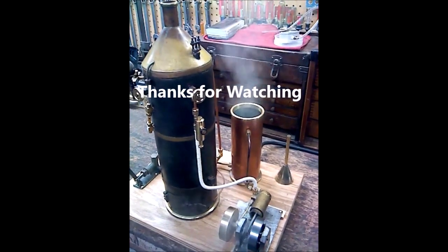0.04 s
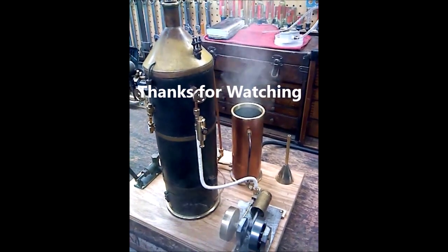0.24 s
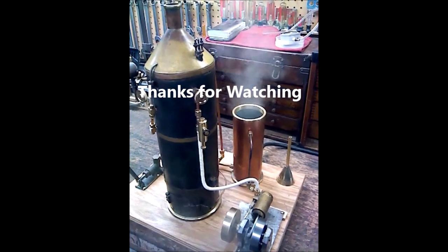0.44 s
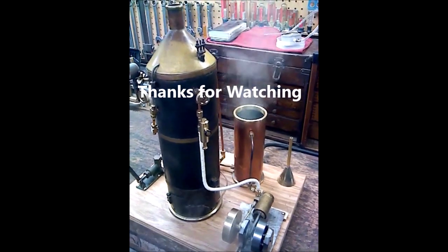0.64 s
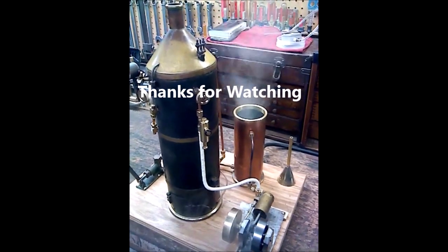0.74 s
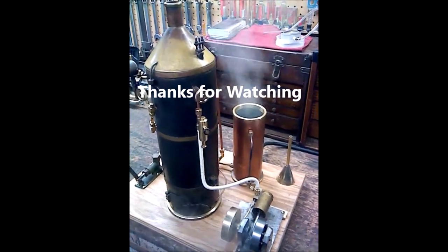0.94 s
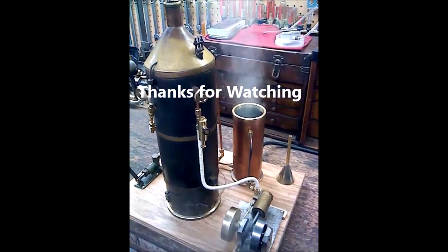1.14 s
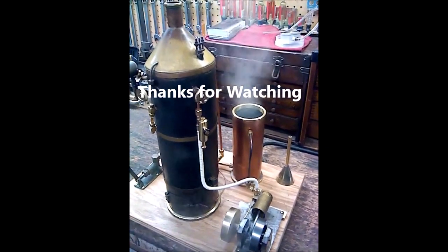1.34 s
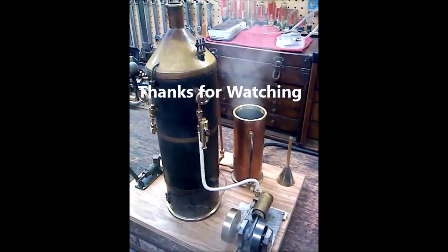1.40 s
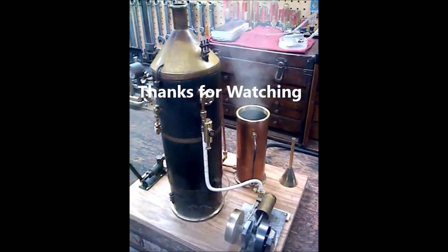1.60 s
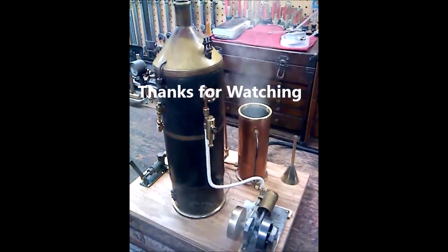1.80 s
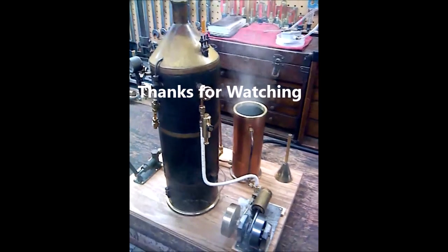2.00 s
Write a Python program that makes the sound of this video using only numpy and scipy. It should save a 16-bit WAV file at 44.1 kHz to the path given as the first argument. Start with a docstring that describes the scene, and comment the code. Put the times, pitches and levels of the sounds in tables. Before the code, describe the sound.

A small steam engine chuffs quickly and evenly over a high steam hiss.

```python
"""On a workshop bench, a single-cylinder model steam engine runs at about 500 turns a minute.
Once a turn, wet steam chuffs from the exhaust; half a turn later the crank takes up its play
with a soft double knock. Leaking steam sputters all the time, the burner murmurs under the
boiler, and the mains hums faintly. Twice the level dips briefly."""
import sys
import numpy as np
from scipy import signal
from scipy.fft import rfft, irfft
from scipy.io import wavfile

SR = 44100
rng = np.random.default_rng(int(sys.argv[2]) if len(sys.argv) > 2 else 0)


def dump_mix(stems):
    """Bounce the given channels to the path in sys.argv[1] as a 16-bit WAV at rate SR."""
    frames = np.atleast_2d(stems).T  # one column per channel
    limited = np.clip(frames, -1, 1)  # hard clip at full scale
    pcm = np.round(limited * 32767).astype(np.int16)
    wavfile.write(sys.argv[1], SR, pcm)


N = 90581


def amp(db):
    """Turns decibels into a gain."""
    return 10 ** (np.asarray(db) / 20)


def evened(x):
    """Scales a signal to an average power of 1."""
    return x / np.sqrt(np.mean(x ** 2) + 1e-20)


def read(points, hz):
    """Looks up a table's value at any pitch, gliding between its rows."""
    f, value = np.transpose(points)
    return np.interp(np.log(hz + 1), np.log(f + 1), value)


def add(mix, s, sound):
    """Mixes a sound in at s seconds."""
    part = mix[max(round(s * SR), 0):][:len(sound)]
    part += sound[:len(part)]


def colour(x, spectrum, rings, size=8192):
    """Gives a sound a broad tone colour with narrow ringing peaks on top."""
    hz = np.fft.rfftfreq(size, 1 / SR)
    peaks_db = sum(boost / (1 + (2 * (hz - f) / width) ** 2) for f, width, boost in rings)
    cepstrum = irfft(np.log(amp(read(spectrum, hz) + peaks_db)))
    cepstrum[1:size // 2] *= 2  # folded so that ringing only comes after its cause
    cepstrum[size // 2 + 1:] = 0
    ring = irfft(np.exp(rfft(cepstrum)))[:size // 2]
    return signal.oaconvolve(x, ring / np.linalg.norm(ring))[:N]


# tones of the hum: f/Hz, level/dB
HUM_TONES = [(60, -84), (120, -84)]
def hum():
    """The mains supply hums faintly in two low tones."""
    t = np.arange(N) / SR
    return sum(amp(db) * np.sqrt(2) * np.sin(2 * np.pi * (hz * t + rng.random())) for hz, db in HUM_TONES)


# how strong the flame's noise is, from low to high: f/Hz, level/dB
FLAME_SPECTRUM = [(25, -15), (70, -20.5), (100, -16.5), (170, -20.5), (270, -15.5), (380, -19), (600, -9),
                  (700, -14), (820, 1.5), (1050, 0.5), (1200, -7.5), (1450, -6), (1680, -5.5), (1850, -20),
                  (2400, -19), (4000, -16.5), (16000, -46)]
# pitches at which the flue (the chimney) rings: f/Hz, width/Hz, boost/dB
FLUE_RINGS = [(572, 62, 2), (965, 57, 6), (1373, 72, 8.5)]
def burner():
    """The flame's soft roar flutters in the flue and slowly fades."""
    start_db, fade_db_per_s, flutter_db, flutter_hz = -54.5, -2, 1.1, (9, 53)
    flutter_band = signal.butter(2, flutter_hz, "bandpass", fs=SR, output="sos")
    flutter = evened(signal.sosfilt(flutter_band, rng.standard_normal(N)))
    level = amp(start_db + fade_db_per_s * np.arange(N) / SR + flutter_db * flutter)
    return level * colour(rng.standard_normal(N), FLAME_SPECTRUM, FLUE_RINGS)


def wet_steam(drops_per_s, drop_share):
    """Swirling steam hisses; bursting droplets click and take drop_share of the power."""
    clicks = evened(rng.uniform(-0.88, 1, N) * (rng.random(N) < drops_per_s / SR))
    return np.sqrt(1 - drop_share) * rng.standard_normal(N), np.sqrt(drop_share) * clicks


# how strong the leak is, from low to high: f/Hz, level/dB
LEAK_SPECTRUM = [(2000, -47), (3600, -38.5), (4800, -20.5), (5850, -18), (6350, -6), (7150, -5),
                 (7550, -13), (8050, -13), (8550, -21.5), (9800, -28.5), (13000, -33), (15000, -28),
                 (15800, -25.5)]
# pitches at which the leak rings: f/Hz, width/Hz, boost/dB
LEAK_PEAKS = [(6245, 70, 6), (6590, 70, 7), (6790, 60, 4), (6990, 80, 8), (7200, 80, 6), (8900, 320, 7),
              (12250, 250, 4), (14520, 170, 7), (15670, 200, 10)]
def leak():
    """Wet steam leaks out with a high sizzle that slowly weakens."""
    start_db, fade_db_per_s = -45, -1.63
    level = amp(start_db + fade_db_per_s * np.arange(N) / SR)
    hiss, drops = wet_steam(drops_per_s=500, drop_share=0.16)
    return level * colour(hiss + drops, LEAK_SPECTRUM, LEAK_PEAKS)


# how long the room takes to fade by 60 dB at each pitch: f/Hz, t/s
ROOM_FADE = [(200, 0.11), (3000, 0.093), (8000, 0.096), (16000, 0.048)]
def workshop(sound):
    """The room answers with a short wash of echoes whose treble dies first."""
    echoes = rng.standard_normal(SR // 2) * (np.arange(SR // 2) / SR > .003)
    hz, t, bands = signal.stft(echoes, SR, nperseg=256)
    fade = np.exp(-np.log(1000) * t / read(ROOM_FADE, hz)[:, None])
    tail = signal.istft(bands * fade, SR)[1]
    return signal.fftconvolve(sound, tail / np.linalg.norm(tail))[:N]


# echoes from boiler and bench: delay/s, gain
NEAR_ECHOES = [(.0014, 0.0011), (.00205, 0.13), (.0042, 0.19), (.0062, .14)]
def bench(sound):
    """The sound arrives directly, then again off nearby surfaces."""
    out = sound.copy()
    for delay, gain in NEAR_ECHOES:
        add(out, delay, gain * sound)
    return out


# a blow and its rebounds: delay/s, level/dB
KNOCK_BOUNCES = [(0, 1.5), (.0043, -1), (.0105, -14.5)]
# ringing tones of the engine's base and board: f/Hz, level/dB, t/s to fade by 60 dB
BASE_TONES = [(257, -21, 0.055), (580, -12.5, 0.03), (753, -6.5, 0.09), (1370, -3, 0.022),
              (1926, 0.5, 0.017), (2210, 0, 0.019), (2450, -0.5, .016), (2730, -4, 0.013),
              (2980, -7, 0.018), (3276, -6, 0.017)]
def crank(turns):
    """On each return stroke the slightly loose crank knocks, bounces and makes the base ring."""
    half_turn_s, jitter_s, knock_db = .0622, .00015, -54
    t, blows = np.arange(SR // 8) / SR, np.zeros(N)
    for start, _, db in turns:
        for delay, bounce_db in KNOCK_BOUNCES:
            when = start + half_turn_s + delay + jitter_s * rng.standard_normal()
            add(blows, when, amp([db + bounce_db]))
    ring = sum((-1) ** k * amp(db) * np.exp(-np.log(1000) * t / fade_s) * np.sin(2 * np.pi * hz * t)
               for k, (hz, db, fade_s) in enumerate(BASE_TONES))
    return amp(knock_db) * signal.oaconvolve(blows, ring)[:N]


# how strong the steam jet is, from low to high: f/Hz, level/dB
JET_SPECTRUM = [(300, -34.5), (1000, -24), (2100, -23.5), (2700, -18.5), (3550, -19.5), (4500, -15.5),
                (5800, -9), (6500, -3), (7100, -2.5), (7900, -4.5), (8700, -10), (10200, -10.5),
                (11400, -13), (13200, -11), (13900, -7), (15700, -10.5)]
# the same for bursting droplets: f/Hz, level/dB
DROP_SPECTRUM = [(1000, -36), (3500, -27), (5600, -17.5), (6500, 0), (7200, -2), (8500, -11), (11000, -26),
                 (16000, -23.5)]
# pitches at which the exhaust pipe rings: f/Hz, width/Hz, boost/dB
PIPE_RINGS = [(3040, 70, 8), (3865, 110, 12), (4050, 60, 4), (5610, 60, 4), (6590, 60, 5), (6990, 70, 5),
              (7200, 70, 4), (8140, 70, 4)]
# larger drops spat out with the steam: t/s, level/dB
BIG_DROPS = [(.0565, -19), (.1805, -16), (.185, -19), (1.0152, -21), (1.3815, -20), (1.765, -17)]
def exhaust(turns):
    """Once a turn, a puff of steam and its droplets sound through the exhaust pipe."""
    open_s, shut_s, chuff_db = 0.0079, .026, -30.5
    t, flow, spits = np.arange(SR // 8) / SR, np.zeros(N), np.zeros(N)
    puff_db = (2000 * np.minimum(t - open_s, 0)  # the steam port opens (dB per second)
               - 170 * np.maximum(t - open_s, 0)  # the pressure sags
               - 950 * np.maximum(t - shut_s, 0))  # the port shuts
    for start, db, _ in turns:
        add(flow, start, amp(chuff_db + db + puff_db))
    for start, db in BIG_DROPS:
        add(spits, start, amp([db]))
    hiss, drops = wet_steam(drops_per_s=700, drop_share=0.23)
    jet = colour(flow * hiss + spits, JET_SPECTRUM, PIPE_RINGS)
    return jet + colour(flow * drops, DROP_SPECTRUM, PIPE_RINGS)


# one row per turn, as the exhaust opens: t/s, chuff level/dB, knock level/dB
TURNS = [(0.048, -2, 3.5), (0.1683, -2, -0.5), (0.2886, -2.5, 3.5), (0.4089, -3, 2), (0.5292, -3, 2.5),
         (0.6496, -3.5, 2), (0.7699, -4.5, 2), (0.8902, -4.5, -1), (1.0105, -4.5, -0.5),
         (1.1308, -4.5, -3.3), (1.2511, -4.5, -0.5), (1.3714, -4.5, 2), (1.4917, -5.5, -0.5),
         (1.612, -5, -1), (1.7323, -5.0, -4), (1.8526, -5.5, -1.5), (1.973, -5.5, -2.5)]
def scene():
    """The engine chuffs and knocks, with its echoes, over the hum, burner and leak."""
    engine, room_db = bench(exhaust(TURNS)) + crank(TURNS), -7.5
    return (engine + amp(room_db) * workshop(engine) + leak() + burner() + hum())[None]


# brief dips in level: deepest at t/s, fall/s, rise/s, level/dB
LEVEL_DIPS = [(.219, .004, .004, -12), (1.717, .012, .004, -13)]
def record(dry):
    """Twice everything but the sizzle dips briefly; the very highest treble is cut off."""
    sizzle_hz, top_hz = (6000, 7800), 15800
    t = np.arange(N) / SR
    dip = amp(sum(db * np.exp(-((t - when) / np.where(t < when, fall, rise)) ** 2)
                  for when, fall, rise, db in LEVEL_DIPS))
    sizzle = signal.sosfiltfilt(signal.butter(2, sizzle_hz, "bandpass", fs=SR, output="sos"), dry)
    dipped = sizzle + dip * (dry - sizzle)
    treble_cut = signal.firwin(511, top_hz, window=("kaiser", 9), fs=SR)
    return signal.oaconvolve(dipped, treble_cut[None], "same")


dry = scene()
out = record(dry)
dump_mix(out)
```